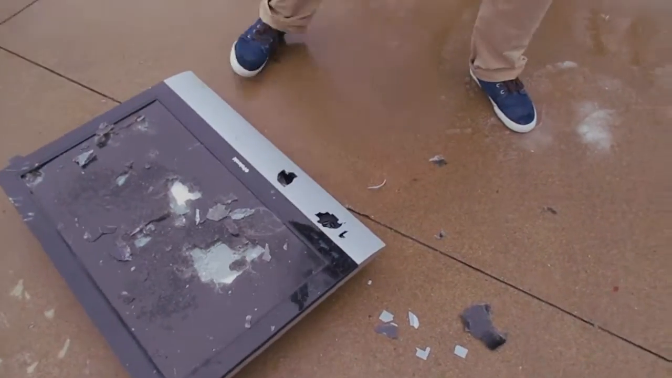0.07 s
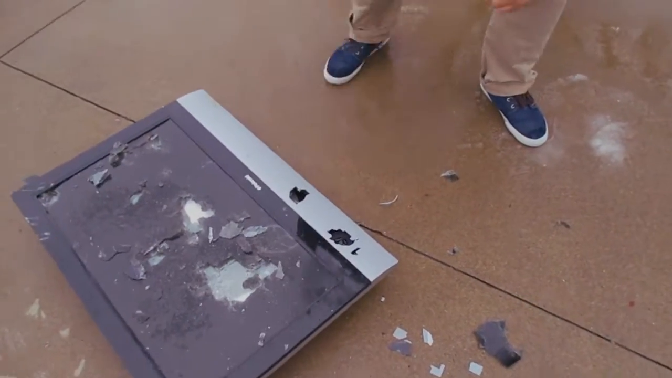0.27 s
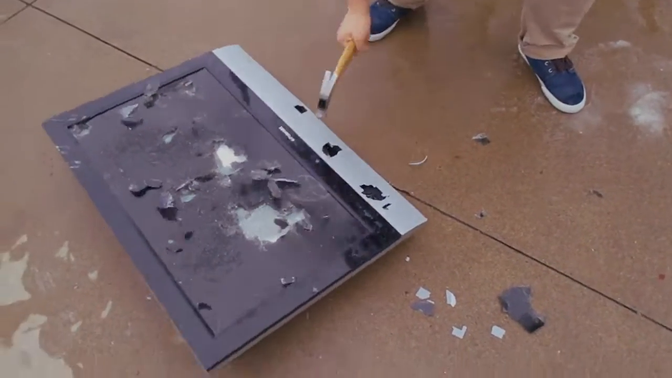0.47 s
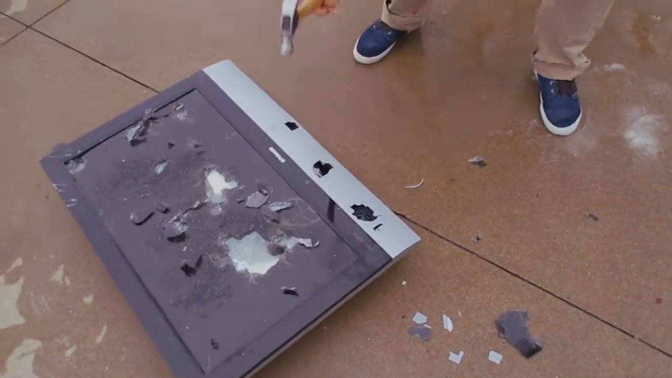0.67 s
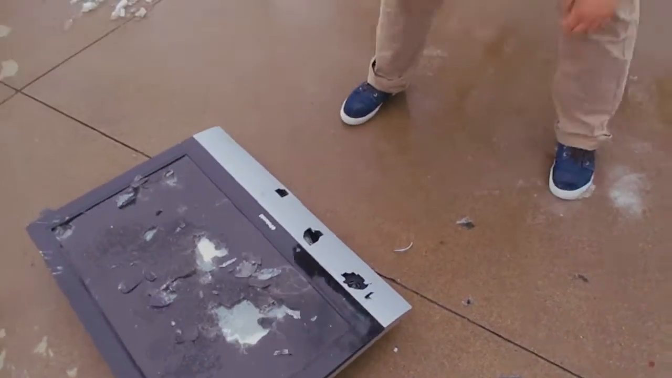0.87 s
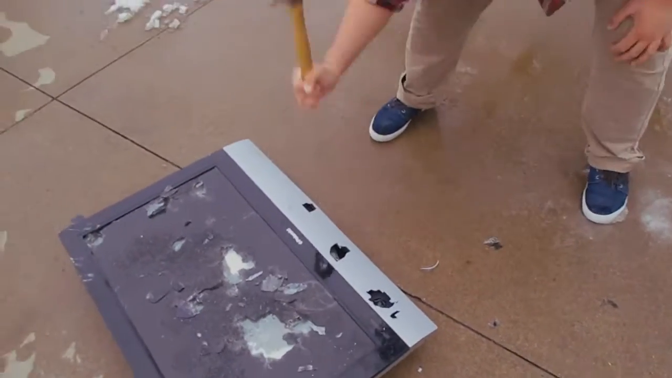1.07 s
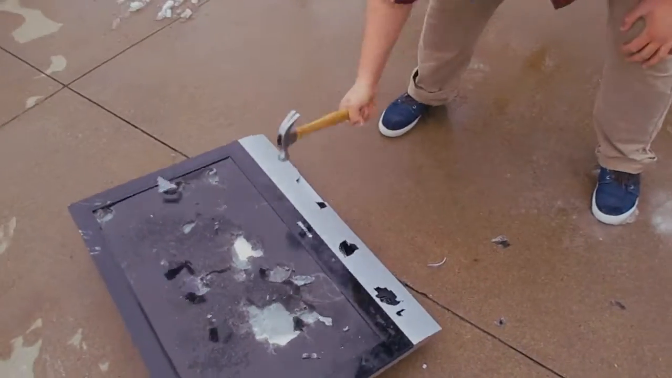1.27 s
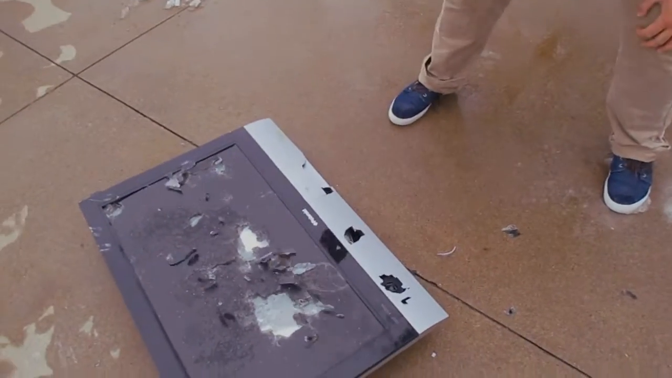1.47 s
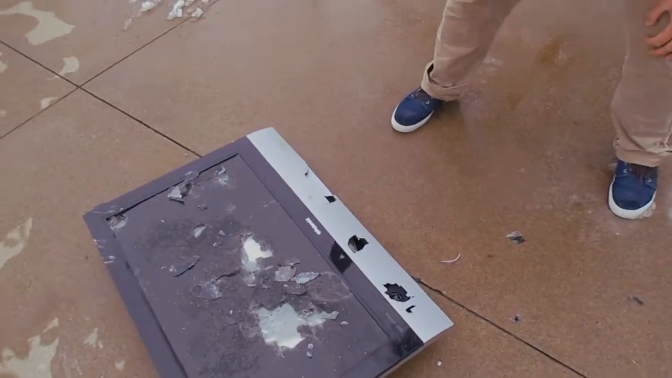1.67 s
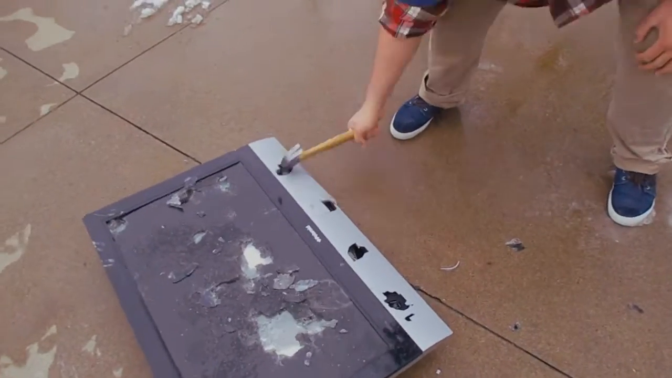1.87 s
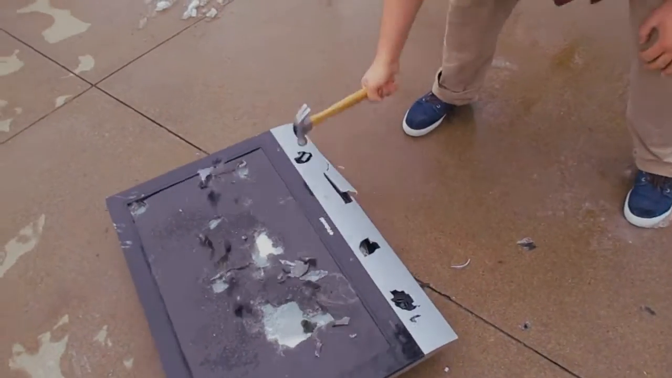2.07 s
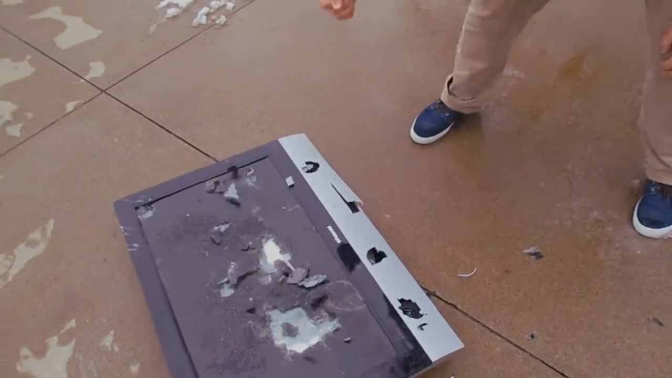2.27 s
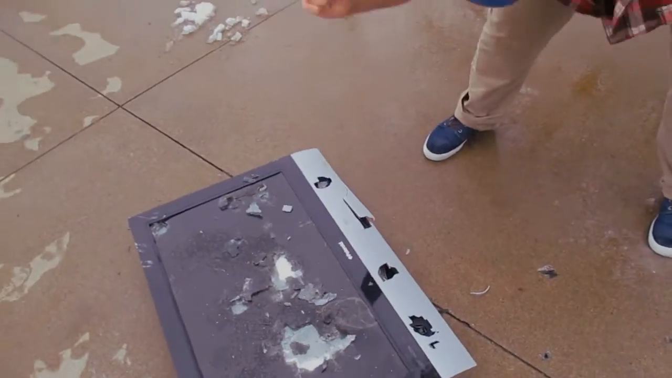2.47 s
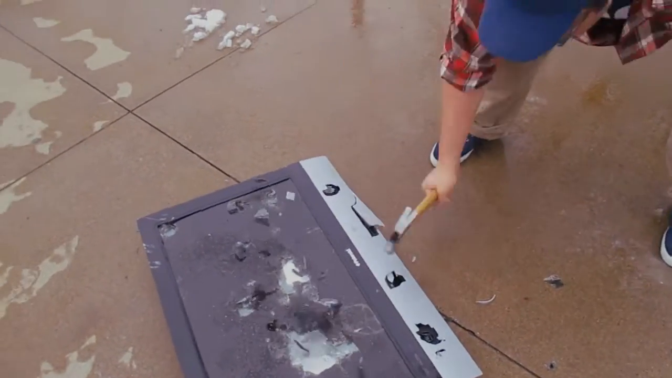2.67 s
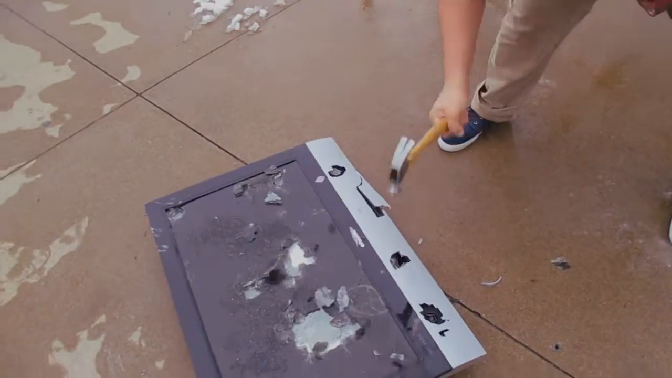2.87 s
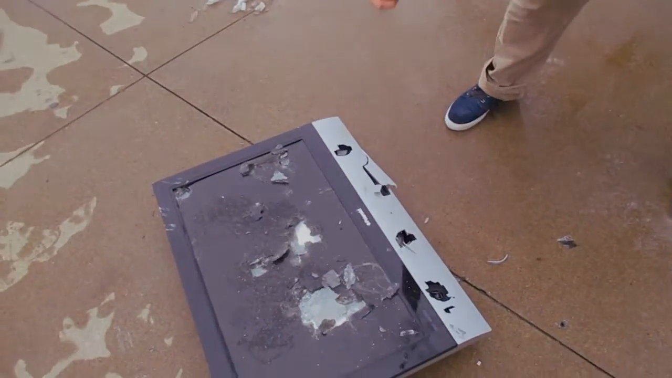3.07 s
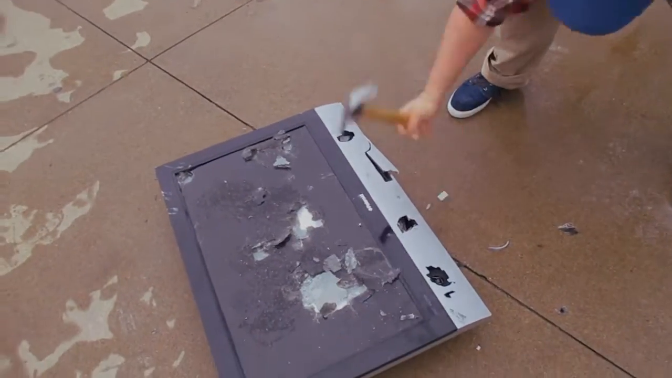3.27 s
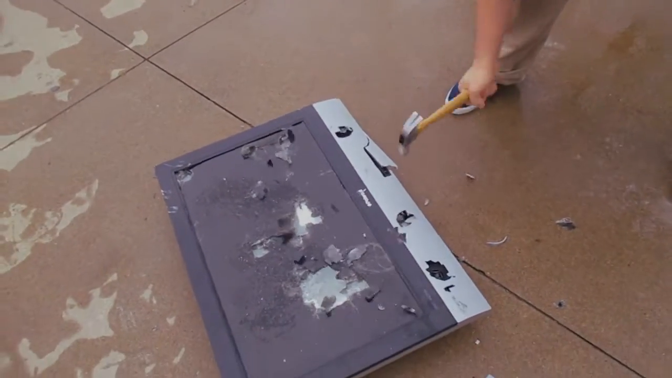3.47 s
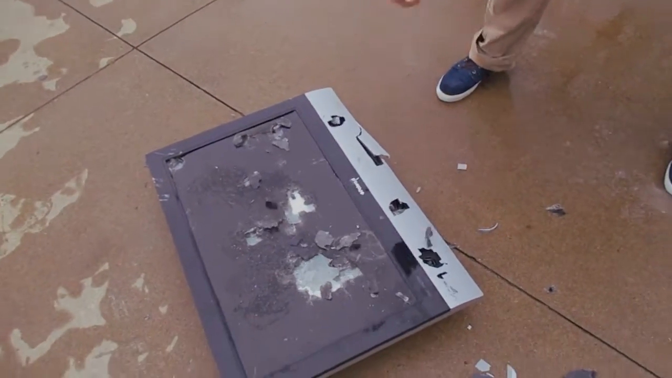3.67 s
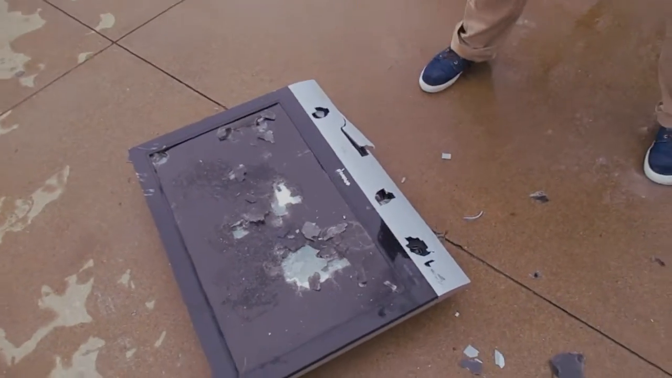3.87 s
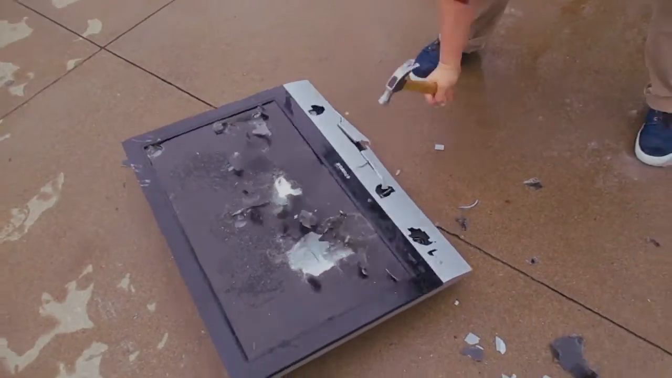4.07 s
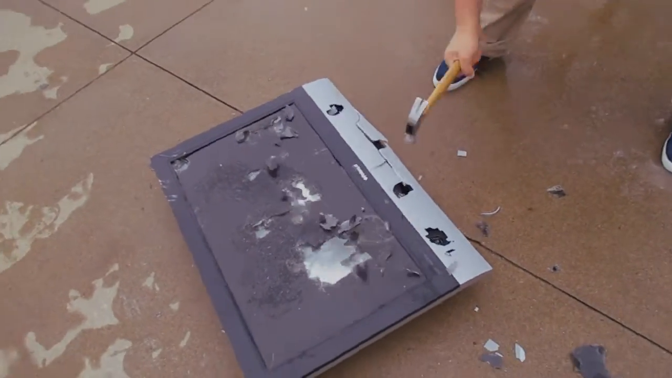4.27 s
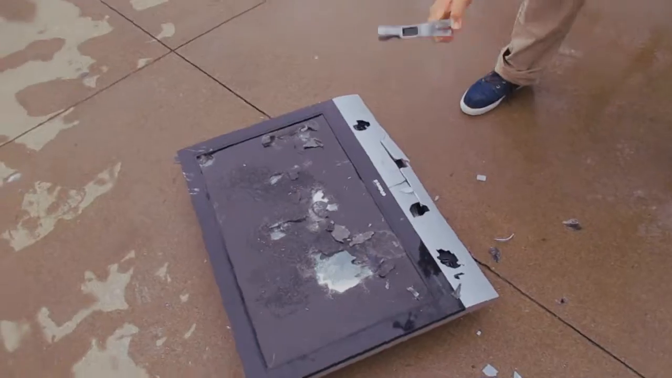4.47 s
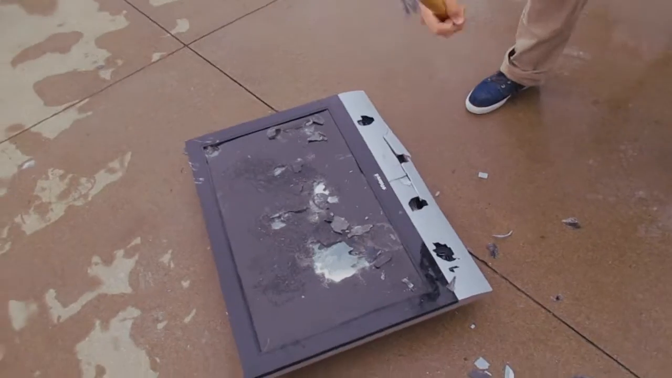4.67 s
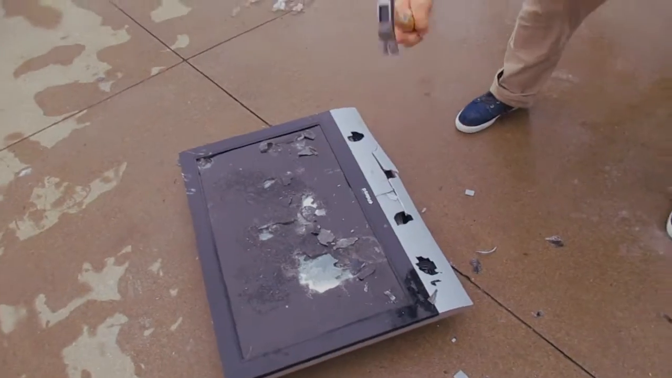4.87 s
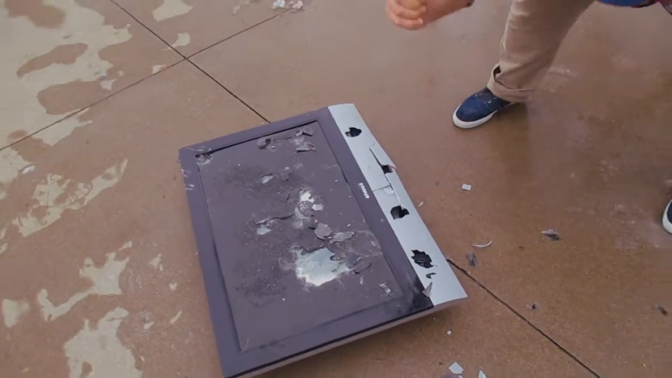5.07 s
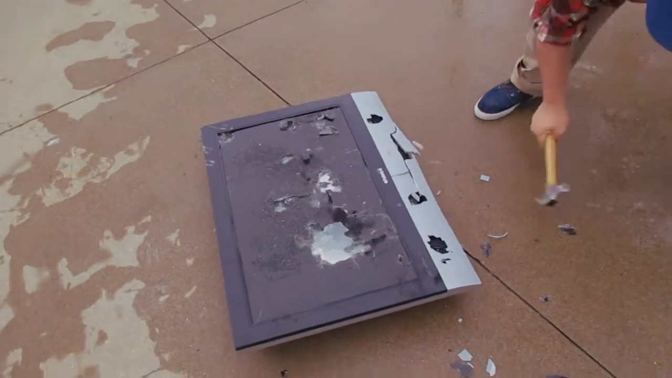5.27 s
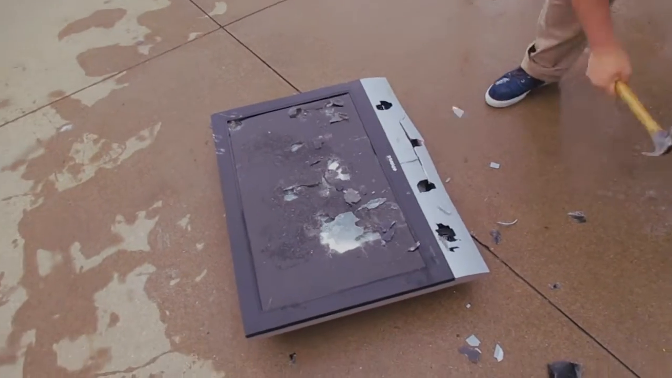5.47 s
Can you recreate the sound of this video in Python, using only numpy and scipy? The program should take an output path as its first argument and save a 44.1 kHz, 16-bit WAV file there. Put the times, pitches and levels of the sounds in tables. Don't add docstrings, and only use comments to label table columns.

```python
import sys
import numpy as np
from scipy import signal
from scipy.io import wavfile

SR = 44100
rng = np.random.default_rng(int(sys.argv[2]) if len(sys.argv) > 2 else 0)


def ratio_of_db(decibels):
    return 10 ** (np.asarray(decibels, float) / 20)


def transcribe(signal):
    frames = np.atleast_2d(signal).T
    limited = np.clip(frames, -1, 1)
    pcm = np.round(limited * 32767).astype(np.int16)
    wavfile.write(sys.argv[1], SR, pcm)


N = 243873
T = np.arange(N) / SR

# (time [s], deep boom [dB], upper boom [dB], plastic crack [dB], crack length [s])
BLOWS = [
    (0.5165, -13, -12, -11.5, 0.022),
    (1.274, -7.5, -14, -8, 0.007),
    (2.009, -23.5, -11.5, -8.5, 0.0013),
    (2.7554, -5.5, -11, -11.5, 0.0026),
    (3.4414, -4.5, -15.5, -12, 0.01),
    (4.1507, -9.5, -13.5, -8, .0032),
    (5.3436, -13.5, -20, -11, 0.016),
]


def unit_rms(x):
    return x / np.sqrt(np.mean(x ** 2) + 1e-20)


def at_hz(points, hz):
    points = np.array(points)
    return np.interp(np.log(hz), np.log(points[:, 0]), points[:, 1])


def bandpass(order, low_hz, high_hz):
    return signal.butter(order, [low_hz, high_hz], "band", fs=SR, output="sos")


def drift(rate):
    r = np.exp(-80 * np.pi * rate / SR)
    slow = signal.lfilter([1], [1, -2 * r, r * r], rng.standard_normal(N // 40 + 2002))[2000:]
    return np.interp(np.arange(N) / 40, np.arange(len(slow)), unit_rms(slow))


def ring(clicks, hz, t60):
    r, w = ratio_of_db(-60 / (t60 * SR)), 2 * np.pi * hz / SR
    return signal.lfilter([0, np.sin(w)], [1, -2 * r * np.cos(w), r * r], clicks + 1e-18)


def burst(s, level_db, hold_s, t60, rise_s=.0002):
    out, at = np.zeros(N), round(s * SR)
    age = T[:min(SR // 2, N - at)]
    decay_db = 60 * np.clip(age - hold_s, 0, 1) / t60
    out[at:at + len(age)] = np.clip(age / rise_s, 0, 1) * ratio_of_db(level_db - decay_db)
    return out


def casing():
    # (frequency [Hz], level [dB], t60 [s])
    modes = [(170, -12, 0.04), (240.8, -3.5, 0.11), (276, 4.5, 0.054), (346.5, 1.5, 0.042),
             (396.3, -5.5, 0.081), (426.3, -1.5, 0.1), (490, -2.5, .09), (555, -6.5, 0.064),
             (872, -13.5, 0.25), (943, -10, 0.028), (1150, -8.5, 0.03), (1302, -4, 0.026),
             (1401, -5, 0.074), (1545, -8, 0.091), (1866, -13.5, 0.058), (2280, -15, 0.038)]
    blow, fall = np.array(BLOWS), np.array(pieces())
    at = np.round(np.r_[blow[:, 0], fall[:, 0]] * SR).astype(int)
    shower_knock_db = -4
    fall[:, 1:3] += shower_knock_db * fall[:, 5:]
    deep = np.r_[blow[:, 1] - 6, fall[:, 2] - 12]
    upper = np.r_[blow[:, 2] - 4, fall[:, 2] - 4]
    thin = np.r_[blow[:, 3] - 3, fall[:, 1] - 5]
    vary = rng.standard_normal((len(at), len(modes)))
    snap = np.zeros(N)
    snap[at[:len(blow)]] = -ratio_of_db(blow[:, 3] - 0.5)
    out = ring(snap, 1700, 0.0053)
    for (hz, level_db, t60), chance in zip(modes, vary.T):
        strength_db = deep if hz < 350 else upper if hz < 700 else thin
        spot_db = 3 * chance
        clicks = np.zeros(N)
        clicks[at] = -ratio_of_db(strength_db + level_db + spot_db) * np.where(chance > .6, -1, 1)
        out += ring(clicks, hz, t60)
    return out


def breakage():
    # (frequency [Hz], level [dB per Hz])
    hollow_tone, plastic_tone = [(76, -43), (130, -17), (290, 3.5), (503, 3.5), (639, -13.5), (700, -4.5),
                                 (910, -35), (1540, -120)], [(350, -30), (600, -2.5), (1010, 0.5), (1210, -5),
                                                 (1380, -0.5), (1640, -12), (1790, -6.5), (3000, -21.5),
                                                 (3900, -46), (6600, -120)]
    shard_tone, glass_tone = [(1180, -29), (2000, -2.5), (2720, -5), (4440, -7), (10000, -15.5),
                              (12100, -19), (15500, -30.5)], [(1180, -22), (2000, 1), (2650, -6), (3640, 1.5), (4120, -2),
                                              (11400, -4), (15200, -21.5), (16000, -26.5), (16400, -40)]
    glass_db_per_crack_s = 197
    crack_t60_s, spent_per_crack_s = .17, 3.5
    shower_rise_s = 0.011

    hollow, plastic, shards = ratio_of_db(rattle_db() + 2.2 * drift(70)) ** 2
    glass = 0
    for s, _, boom_db, plastic_db, hold_s in BLOWS:
        glass_db = plastic_db + glass_db_per_crack_s * hold_s
        t60 = crack_t60_s - spent_per_crack_s * hold_s
        hollow = hollow + burst(s, boom_db - 1.5, hold_s, t60 * 0.69) ** 2
        plastic = plastic + burst(s, plastic_db - 6, hold_s, t60) ** 2
        glass = glass + burst(s, glass_db - 9.5, hold_s, t60 * 1.435) ** 2
        glass = glass + burst(s, glass_db, 0.0026, 0.063) ** 2
    for s, plastic_db, casing_db, glass_db, t60, shower in pieces():
        rise_s, early_s = (shower_rise_s, shower_rise_s / 2) if shower else (.0003, 0)
        start = s - early_s
        hollow = hollow + burst(start, casing_db - 5, rise_s + 0.009, t60 * 1.2, rise_s) ** 2
        plastic = plastic + burst(start, plastic_db - 6, rise_s + 0.0018, t60, rise_s) ** 2
        shards = shards + burst(start, glass_db - 1.5, rise_s + 0.0024, t60 * 1.13, rise_s) ** 2
    uneven = ratio_of_db(0.53 * drift(140))
    return (fragments(np.sqrt(hollow), hollow_tone, 150, 671, 1500,
                      spread_db=2.0, cycles=15, dulling=0, count=10)
            + fragments(np.sqrt(plastic), plastic_tone, 556, 2800, 2500,
                        spread_db=-1.0, cycles=18, dulling=0, count=16)
            + fragments(np.sqrt(shards), shard_tone, 2300, 14000, 7000,
                        spread_db=-0.5, cycles=9.8, dulling=.1, count=18)
            + fragments(np.sqrt(glass) * uneven, glass_tone, 2000, 15500, 23000,
                        spread_db=1.5, cycles=19, dulling=0.29, count=18))


def fragments(envelope, spectrum, low_hz, high_hz, per_s, spread_db, cycles, dulling, count):
    sizes = ratio_of_db(spread_db * np.minimum(rng.exponential(1, N), 4)) * rng.choice([-1, 1], N)
    clicks = sizes * (rng.random(N) < per_s / SR)
    pitches = np.geomspace(low_hz, high_hz, count)
    dealt = rng.integers(0, count, N)
    share = envelope / envelope.max() + 1e-9
    steady, played = 0, 0
    for k, hz in enumerate(pitches):
        mine = clicks * (dealt == k) * ratio_of_db(at_hz(spectrum, hz)) * hz
        steady = steady + ring(mine[:SR], hz, cycles / hz)
        played = played + ring(mine * envelope * share ** (dulling * k / count), hz, cycles / hz)
    return played / np.std(steady)


def pieces():
    # (time [s], plastic [dB], glass [dB], t60 [s])
    showers = [
        (0.589, -27, -30.5, 0.22),
        (1.362, -26, -34, 0.056),
        (2.087, -30, -35, 0.12),
        (2.829, -25, -36.5, 0.081),
        (3.511, -22, -29, 0.1),
        (4.232, -22.5, -31, 0.16),
        (5.42, -26, -36.5, 0.15),
    ]
    # (time [s], plastic [dB], glass [dB], t60 [s])
    landings = [(.006, -43, -55, 0.29), (0.371, -41.5, -32.5, 0.14), (0.399, -44.5, -51, 0.27),
                (.621, -22.5, -44, 0.026), (.664, -32, -45, 0.12), (.751, -23.5, -34.5, 0.15),
                (0.809, -26.5, -45, 0.13), (.856, -24.5, -36.5, 0.13), (.93, -37, -43.5, 0.21),
                (1.422, -24.5, -36, 0.073), (1.476, -29, -45, 0.09), (1.496, -25.5, -37, 0.13),
                (1.582, -33, -46, 0.61), (1.596, -34, -37.5, 0.027), (2.187, -22.5, -30.5, 0.13),
                (2.223, -24.5, -35.5, 0.15), (2.29, -44, -63, 0.085), (2.371, -23.5, -35, 0.19),
                (2.476, -31.5, -43.5, 0.065), (2.536, -42, -39, 0.049), (2.878, -35.5, -57, 0.071),
                (3.661, -37, -50, 0.16), (4.355, -22.5, -34.5, 0.088), (4.416, -29.5, -46, 0.15),
                (4.464, -30.5, -41, 0.27), (4.543, -35, -71, 0.18), (5.453, -28.5, -42, 0.14)]
    shower_casing_db, landing_casing_db = -8, -3
    return sorted([(s, p, p + shower_casing_db, g, t60, True) for s, p, g, t60 in showers]
                  + [(s, p, p + landing_casing_db, g, t60, False) for s, p, g, t60 in landings])


def rattle_db():
    # (blow time [s], level [dB], casing share [dB], sag [dB/s], settling time [s])
    rattles = [
        (-.2, -49, -14, 19.5, 0.54),
        (.516, -40.5, 1.2, 11.5, 1),
        (1.273, -40.5, 0.9, 22.5, 1.6),
        (2.009, -45, -1, 5.5, 2.54),
        (2.756, -42, -0.3, 55, 3.11),
        (3.441, -40.5, -1, 47, 3.8),
        (4.151, -41.5, -1.2, 25.5, 4.62),
        (5.344, -39, -2, 4, 6.26),
    ]
    airborne_s, airborne_db = 0.1, -15.5
    settle_db_per_s, settled_db = 109.5, -12.5
    casing_settled_db = -7
    glass_db, glass_settled_db, glass_sag_db_per_s = -5.5, 1.1, 6.5
    out = np.zeros((3, N))
    for s, level_db, casing_db, sag, settles_s in rattles:
        age = T[T >= s] - s
        settled = np.clip((age + s - settles_s) * settle_db_per_s / -settled_db, 0, 1)
        db = level_db + airborne_db * np.clip(1 - age / airborne_s, 0, 1)
        db = db - sag * np.maximum(age - airborne_s, 0) + settled_db * settled
        out[:, T >= s] = (db + casing_db + casing_settled_db * settled,
                          db,
                          db + glass_db + glass_settled_db * settled - glass_sag_db_per_s * age)
    return out


def splinters():
    # (time [s], peak [dB], top share [dB], t60 [s])
    drops = [(0.2309, -60, -5, 0.024), (0.2616, -45.5, -5, 0.034), (0.2747, -44.5, -18, 0.035),
             (0.3044, -45, -29, 0.021), (0.4118, -28.5, -23, 0.028), (1.0465, -45, -7, 0.029),
             (1.1204, -49, -8, 0.024), (1.1408, -46, -14, 0.021), (1.6382, -37, -15, 0.029),
             (2.6434, -44, -18, 0.033), (3.036, -49, -5, 0.024), (3.0674, -51, -6, 0.021),
             (3.1009, -32, -30, 0.037), (3.2032, -40.5, -10.5, 0.055), (3.2204, -53, -19, 0.026),
             (3.3368, -45, -7, 0.027), (3.7988, -44.5, -3, 0.019), (3.852, -49, -20, 0.02),
             (3.8636, -45.5, -15, 0.024), (3.918, -55, -7, 0.024), (4.0354, -57.5, -10, 0.024),
             (4.6022, -31, -10, 0.048), (4.615, -40, -13, 0.022), (4.6305, -37.5, -14, 0.05),
             (4.6955, -40, -12, 0.045), (4.784, -41.5, -11, 0.02), (4.837, -63, -5, 0.025),
             (4.9206, -55.5, -23, 0.019), (4.952, -46.5, -24, 0.022), (5.021, -46, -16, 0.034)]
    out, hiss = np.zeros(N), rng.standard_normal((len(drops), 2, 1500))
    pitches = 5000 * 2 ** rng.uniform(0, 1.2, len(drops))
    for (s, peak_db, top_db, t60), noise, hz in zip(drops, hiss, pitches):
        touch = noise * ratio_of_db(-60 * T[:1500] / t60)
        body = signal.sosfilt(bandpass(2, 2600, 8000), touch[0])
        top = signal.sosfilt(bandpass(2, 7000, 13500), touch[1])
        tick = body + ratio_of_db(top_db) * top + 0.053 * ring(touch[0], hz, 0.01)
        at = round(s * SR)
        out[at:at + 1500] += ratio_of_db(peak_db) * tick / np.abs(tick).max()
    return out


def wind():
    # (time [s], level [dB])
    rumble = [(0.0, -47), (0.28, -53), (0.49, -45), (1.14, -47), (1.26, -58), (1.45, -57.5), (1.86, -48),
              (2.25, -59), (2.43, -49), (2.62, -41.5), (2.77, -39.5), (3.05, -42.5), (3.45, -47.5),
              (3.8, -42), (3.93, -56), (4.24, -50.5), (4.76, -60), (5.53, -55)]
    # (time [s], peak [dB], pitch [Hz], sharp edge [dB])
    slaps = [(0.304, -25.5, 104, -28), (0.396, -20, 282, -34), (0.467, -29, 166, -17),
             (0.917, -29, 94, -15), (1.731, -28.5, 96.9, -23), (2.587, -19, 263, -16),
             (2.644, -21.5, 108, -26), (2.691, -23, 251, -12), (2.718, -20, 203.5, -4),
             (2.994, -22.5, 121, -13), (3, -27.5, 255, 2.5), (3.165, -28.5, 95, -8), (3.206, -27, 207, -11),
             (3.784, -34, 254, -11), (3.797, -26, 291, -10), (3.834, -24, 170, -14),
             (3.859, -31.5, 221, -13), (3.913, -28.5, 212, -14), (4.091, -36.5, 82, -14),
             (5.317, -31.5, 96, -23.5)]
    gust_db, rasp_db = gusts_db()
    eddies = np.clip(drift(37), -2, 1.2)
    out = lumps(np.interp(T, *np.transpose(rumble)), 29, 125, 3.0 * drift(31))
    out = out + lumps(gust_db, 120, 290, 5.3 * eddies)
    out = out + lumps(rasp_db, 340, 850, 5.5 * eddies)
    out = out + lumps(rasp_db - 14.5, 750, 1200, 7.2 * eddies)
    for s, peak_db, hz, edge_db in slaps:
        age = T - s - .004
        swing = np.exp(-(age * hz / 0.44) ** 2) * np.cos(2 * np.pi * hz * age)
        edge = np.exp(-(age / 0.0018) ** 2) * np.cos(2 * np.pi * 560 * age)
        out = out + ratio_of_db(peak_db) * (swing + ratio_of_db(edge_db) * edge)
    return out


def gusts_db():
    # (time [s], length [s], level [dB], rasp share [dB])
    gusts = [
        (0.303, .18, -46, -13.5),
        (1.692, 0.088, -54, -15),
        (2.476, 0.1, -38, -10.5),
        (2.58, .04, -34, -12.5),
        (2.655, 0.081, -31.5, -7.5),
        (2.971, 0.022, -39.5, -10),
        (3.152, 0.065, -41.5, -10.5),
        (3.69, 0.054, -39, -21),
        (3.788, 0.039, -41, -8.5),
    ]
    rise_db_per_s, fall_db_per_s, rasp_fall_db_per_s = 198.5, 130, 149
    s, length, level_db, rasp_db = np.transpose(gusts)[:, :, None]
    early, late = np.maximum(s - T, 0), np.maximum(T - s - length, 0)
    db = level_db - rise_db_per_s * early - fall_db_per_s * late
    rasp = db + rasp_db - rasp_fall_db_per_s * (early + late)
    return db.max(axis=0), rasp.max(axis=0)


def lumps(level_db, low_hz, high_hz, lumpy_db):
    sos, noise = bandpass(3, low_hz, high_hz), rng.standard_normal(N)
    uneven = noise * unit_rms(ratio_of_db(lumpy_db))
    return signal.sosfilt(sos, uneven * ratio_of_db(level_db)) / np.std(signal.sosfilt(sos, noise))


def bird():
    # (time [s], length [s], pitch [Hz], level [dB])
    whistles = [
        (1.04, .12, 4550, -73),
        (3.795, .062, 3715, -64.5),
        (3.855, .048, 3705, -65.5),
    ]
    edge_share, sag_hz_per_s = .35, 350
    tremble, out = 1 + .008 * drift(120), 0
    throb_db = 3 + 3 * np.sin(2 * np.pi * 42 * T) + 2 * drift(60)
    for s, length, hz, level_db in whistles:
        shape = np.clip(np.minimum(T - s, s + length - T) / (edge_share * length), 0, 1)
        pitch = (hz - sag_hz_per_s * (T - s)) * tremble
        out = out + shape * ratio_of_db(level_db + throb_db) * np.sin(2 * np.pi * np.cumsum(pitch) / SR)
    return out


def yard():
    # (frequency [Hz], rms level [dB])
    hum_tones = [(102.3, -56.5), (204.6, -68)]
    # (frequency [Hz], level [dB])
    wash = [(18, -28), (30, -18.5), (79, -7.5), (109, -2.5), (157, -10), (345, -23.5), (801, -17),
            (1630, -22.5), (5040, -43.5), (11700, -54), (16000, -63)]
    hum = 0
    for hz, db in hum_tones:
        hum = hum + np.sqrt(2) * ratio_of_db(db + 1.5 * drift(2.9)) * np.sin(2 * np.pi * hz * T)
    return hum + ratio_of_db(-60.5) * banded_noise(wash, patchy_db=1, rate=5)


def banded_noise(spectrum, patchy_db, rate):
    out, together, white = 0, drift(rate), rng.standard_normal((2, N))
    edges = 25 * 2 ** np.arange(0, 9.6, .5)
    for k, (low, high) in enumerate(zip(edges, edges[1:])):
        band = signal.sosfilt(bandpass(2, low, high), white[k % 2])
        flicker_db = patchy_db * (together + 0.32 * drift(rate))
        out = out + band * ratio_of_db(at_hz(spectrum, np.sqrt(low * high)) + flicker_db)
    return unit_rms(out)


def scene():
    near = casing() + breakage() + splinters()
    near = signal.sosfilt(signal.butter(2, 140, "high", fs=SR, output="sos"), near)
    lag = round(.041 * SR)
    echo = np.pad(signal.lfilter([.3], [1, -.7], near), (lag, 0))[:N]
    return (near + ratio_of_db(-22) * echo + wind() + bird() + yard())[None]


def top_cut(x):
    return signal.sosfilt(signal.butter(12, 16570, fs=SR, output="sos"), x)


def record(dry):
    limit = .75
    x = signal.sosfilt(signal.butter(1, 60, "high", fs=SR, output="sos"), dry)
    x = x / (1 + np.abs(x / limit) ** 3) ** (1 / 3)
    x = signal.sosfilt(signal.cheby2(10, 45, 16500, fs=SR, output="sos"), x)
    return top_cut(x)


dry = scene()
out = record(dry)
transcribe(out)
```